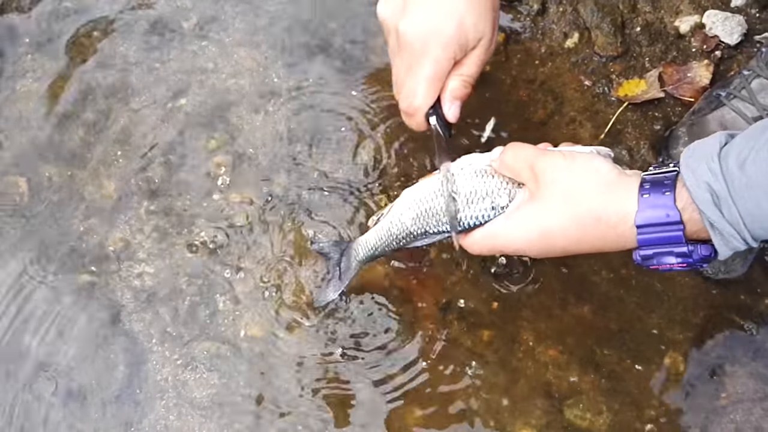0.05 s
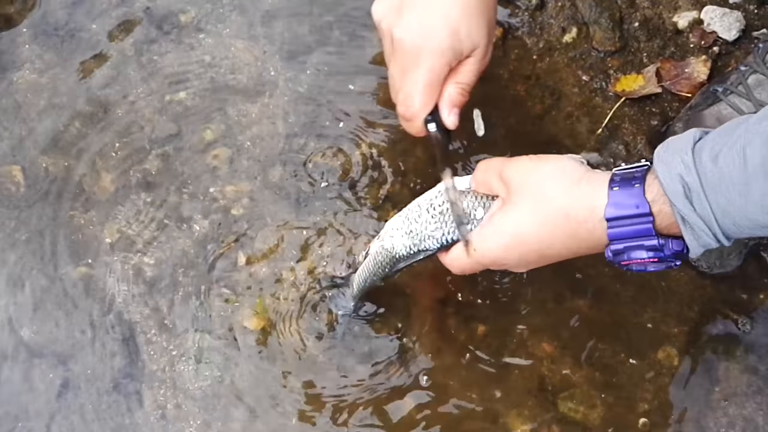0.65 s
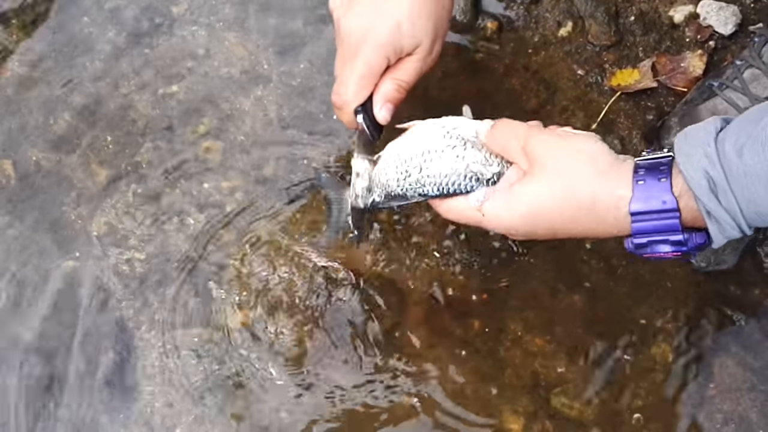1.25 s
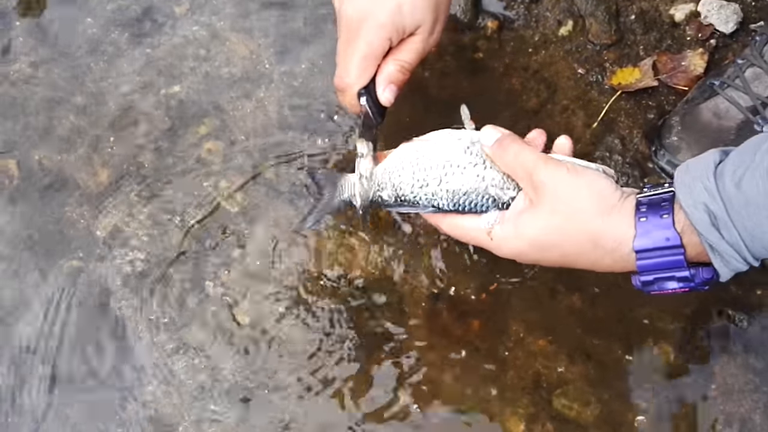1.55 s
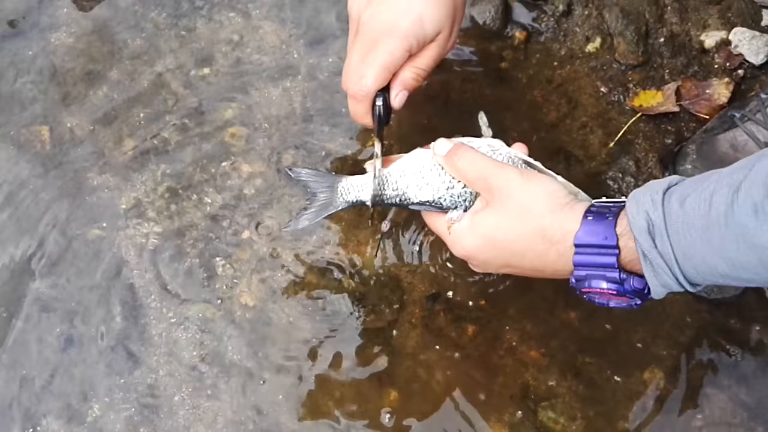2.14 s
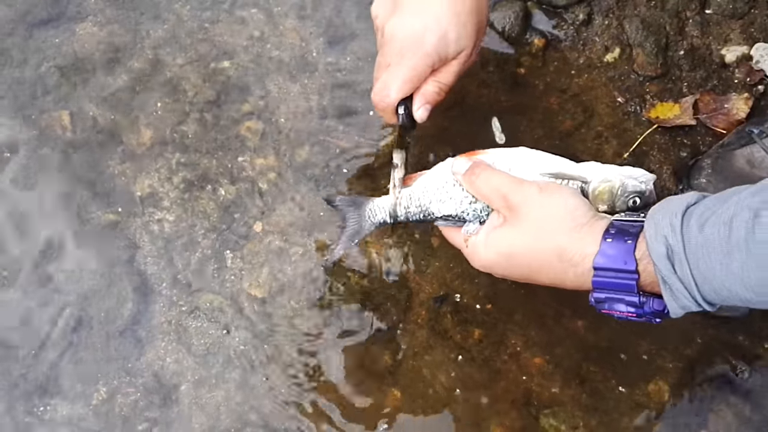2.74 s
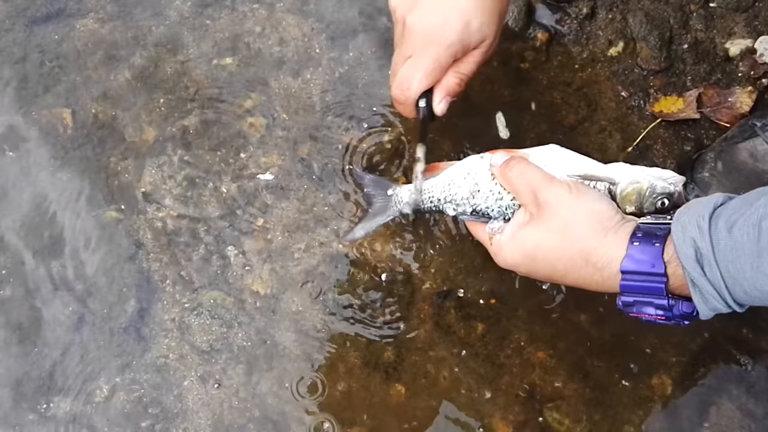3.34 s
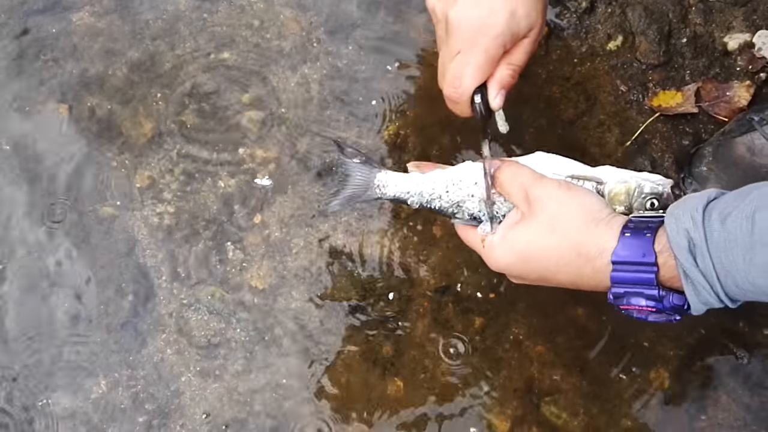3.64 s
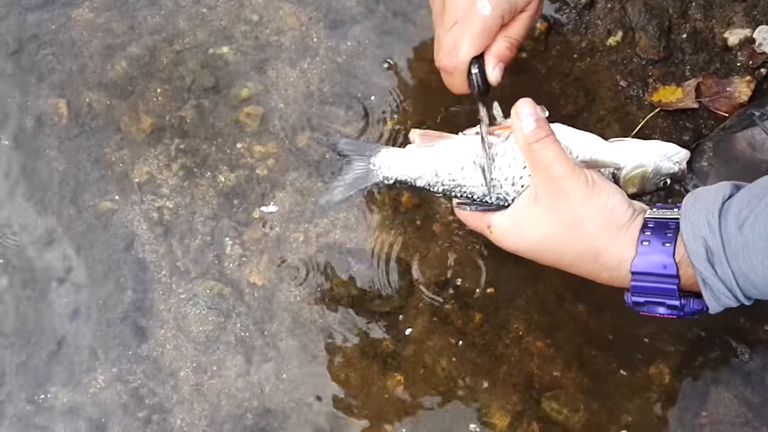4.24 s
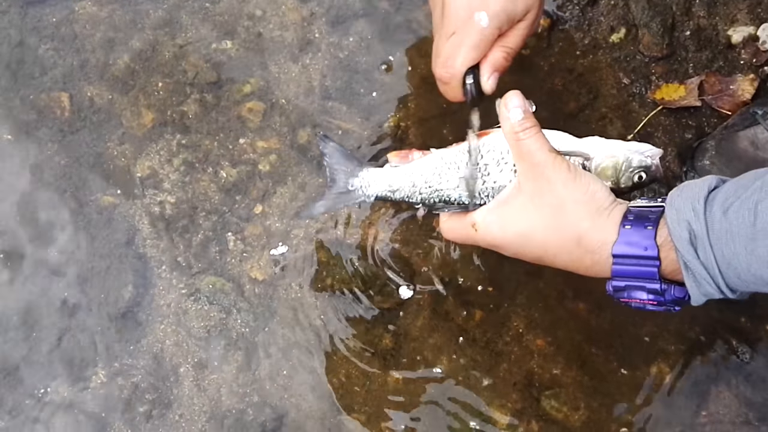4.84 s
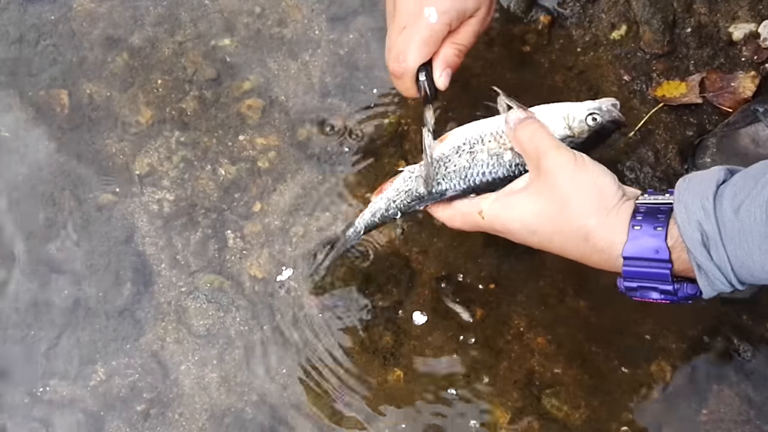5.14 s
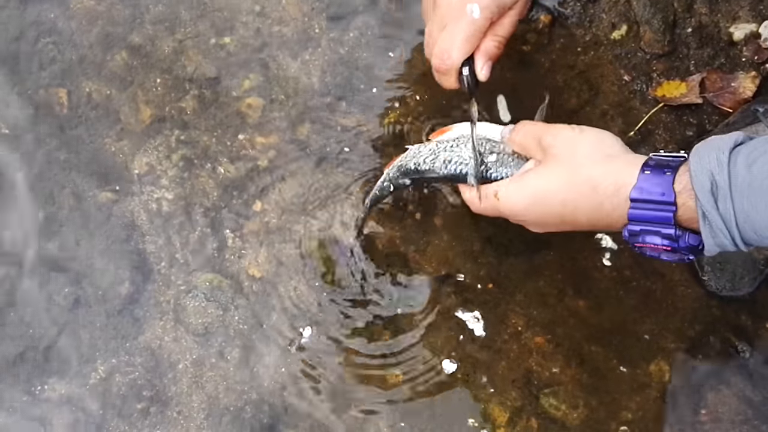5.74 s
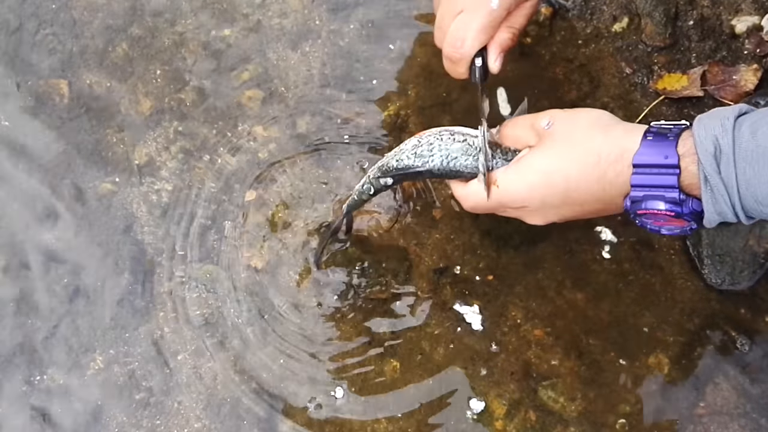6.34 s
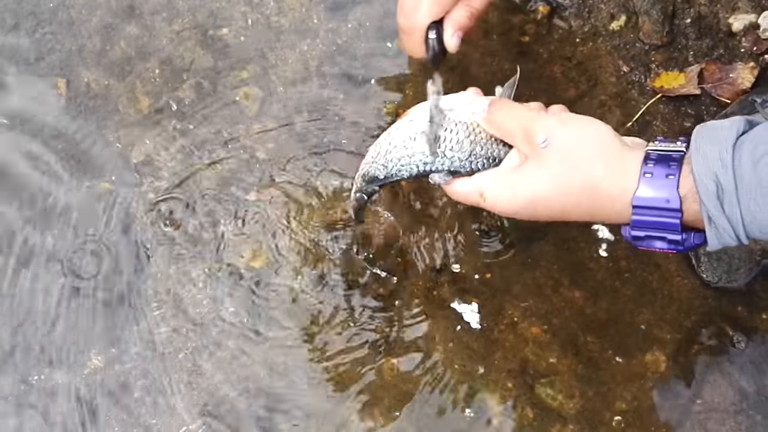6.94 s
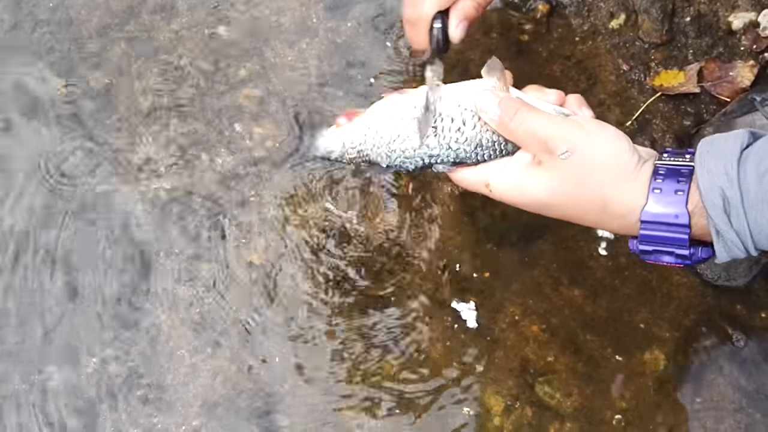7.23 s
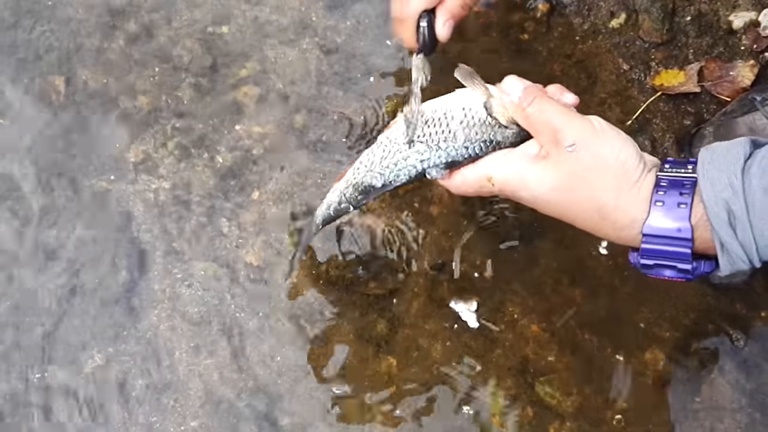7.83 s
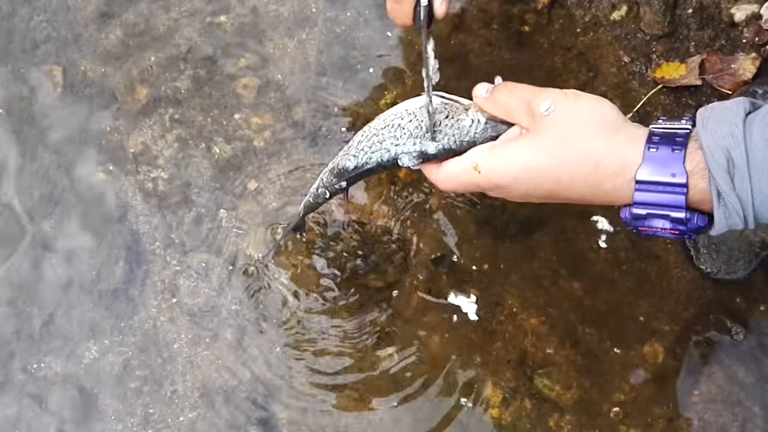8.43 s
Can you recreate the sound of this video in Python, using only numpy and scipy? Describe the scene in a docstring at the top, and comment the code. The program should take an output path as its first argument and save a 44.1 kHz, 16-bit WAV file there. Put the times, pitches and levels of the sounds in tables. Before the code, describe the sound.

A shallow river runs with a soft, even hiss throughout. Close to the microphone, a knife scrapes scales off a small fish in short, irregular strokes, a bright crackle over a duller rasp. During the first second or so, scales snap free sharply, wet skin squelches and a few faint drops fall into the water. From about 1.4 to 2 seconds the scraping pauses and the wet hand creaks softly as it turns the fish. The strokes resume at 2.4 seconds, quick and full of clicks and snaps, with a few more drips after 4 seconds. At 4.7 seconds the knife rests, leaving only the water. A last run of scraping lasts from 5.5 to about 8.2 seconds, with small squelches coming more often. Air buffets the microphone with a dull thump around 6 seconds, and more faintly near 7.3 seconds.

```python
"""A small fish is scaled just above a shallow river, close to a stereo microphone; the water hisses throughout.
For the first second the knife crackles over scale edges and rasps the flesh; scales snap free, drops fall.
From 1.4 s the wet grip sticks and slips, creaking as the fish is turned. Scraping resumes at 2.4 s and
rests at 4.7 s. In the last run, 5.5 to 8.2 s, wet skin squelches more often and air buffets the microphone."""
import sys
import numpy as np
from scipy import signal
from scipy.fft import rfft, irfft
from scipy.io import wavfile
from scipy.ndimage import uniform_filter1d

SR = 44100
rng = np.random.default_rng(int(sys.argv[2]) if len(sys.argv) > 2 else 0)


def transcribe(u):
    """Save the signal u as a 16-bit wav file named by the first command-line argument.

    u: samples, shape (n,) or (channels, n), limited to [-1, 1]; the rate is SR.
    q: integer samples, one column per channel.
    """
    v = np.clip(np.atleast_2d(u).T, -1, 1)
    q = np.round(v * 32767).astype(np.int16)
    wavfile.write(sys.argv[1], SR, q)


N = 378378
TIME = np.arange(N) / SR
HZ = np.fft.rfftfreq(N, 1 / SR)
SIDES = np.array([[.5], [-.5]])  # splits a left-minus-right difference between the channels

# Table levels are relative, ahead of each source's gain; balance is left minus right.
# The river's spectrum at the microphone: f/Hz, level/dB
RIVER_SPECTRUM = [(15, -28), (25, -7), (66, 0), (125, -4), (170, -1.5), (300, -5), (800, -6), (2400, -5.5),
                  (3000, -4), (3900, 0), (7500, -2), (10700, 0), (13500, 0), (14300, -16), (14900, -55)]
# Its loudness over time: t/s, level/dB
RIVER_LEVEL = [(0, -48.5), (.8, -49), (1.35, -50), (1.9, -48.5), (2.8, -48.5), (4.6, -49.5), (5.3, -50.5),
               (5.8, -50), (7.3, -49.5), (8.58, -51.5)]
# How alike it is left and right: f/Hz, correlation
RIVER_CORRELATION = [(60, 0.5), (130, 0.7), (290, 0.79), (640, 0.66), (1410, -0.26), (3100, -0),
                     (6820, -0.091), (15000, -0.08)]
# Its lean in the stereo image: f/Hz, balance/dB
RIVER_PAN = [(60, -1.5), (150, -1), (700, -1), (4500, -.5), (8500, -2.5), (10800, -12), (12000, -5.5),
             (14000, 1)]
# Air on the microphone: middle t/s, length/s, level/dB, upper edge f/Hz
AIR_PUFFS = [(5.974, 0.034, -57, 109), (6.063, 0.1, -49, 110), (6.051, 0.032, -47, 373),
             (6.258, 0.3, -56.5, 118), (7.318, 0.042, -55, 107), (7.412, 0.26, -70, 90)]
# Drops landing in the shallows: t/s, f/Hz, level/dB, ring/cycles, pitch glide
WATER_DROPS = [(.203, 1430, -51, 8.6, -0.048), (0.244, 804, -48, 1.4, -0.013), (.243, 1950, -47, 4, 0.0059),
               (.272, 520, -55, 2.8, -.02), (.63, 5200, -38.5, 5, -0.026), (.684, 2620, -51.5, 7.4, -0.015),
               (.925, 3180, -45, 5.5, -0.026), (1.022, 3000, -51, 12, -0.016),
               (4.104, 1540, -47.5, 3.9, -.02), (4.174, 1160, -49.5, 3.1, -.02),
               (4.462, 1350, -46.5, 5, -0.026)]
# The grip creaking: start t/s, length/s, slips per s, level/dB, f/Hz, t60/s
GRIP_CREAKS = [(1.422, .025, 61, -52.5, 270, 0.015), (1.546, .005, 70, -47, 400, 0.011),
               (1.576, .03, 102, -48.5, 250, 0.017), (1.624, .005, 70, -48.5, 250, 0.022),
               (1.762, .016, 164, -48, 310, 0.011), (1.788, .02, 79, -42, 310, 0.0074),
               (1.845, .058, 79, -38, 332, 0.0054), (1.93, .005, 70, -42, 330, 0.0072)]
# The hand sliding softly between slips: middle t/s, length/s, resonance f/Hz, level/dB
HAND_RUBS = [(1.685, 0.19, 250, -59), (2.015, 0.062, 210, -60)]
# The grip's phase between the microphone ports: f/Hz, left lead/rad
GRIP_LEAD = [(50, -0.4), (300, -1.8), (900, -1.3)]
# Wet skin under blade and fingers: middle t/s, length/s, resonance f/Hz, level/dB
SKIN_SQUELCHES = [ (.125, 0.058, 545, -57.5), (.352, 0.066, 554, -47), (.57, 0.061, 570, -53.5),
                  (.762, 0.062, 500, -53), (.851, 0.02, 550, -55), (.951, 0.073, 534, -56.5),
                  (4.425, 0.046, 920, -56), (4.485, 0.018, 966, -51.5), (4.583, 0.046, 1470, -52),
                  (4.636, 0.066, 980, -55), (5.791, 0.055, 623, -48.5), (6.839, 0.063, 1070, -52.5),
                  (7.032, 0.048, 1040, -49), (7.138, 0.052, 1210, -56.5), (7.226, 0.026, 1160, -43),
                  (7.32, 0.049, 1270, -52.5), (7.383, 0.024, 1090, -50), (7.407, 0.036, 1270, -42.5),
                  (7.505, 0.051, 1290, -54), (7.591, 0.065, 1330, -47), (7.704, 0.017, 1300, -50.5),
                  (7.793, 0.056, 1290, -52.5), (7.989, 0.034, 1230, -57)]
# Spectrum of small scales flicking off: f/Hz, level/dB
FLICK_SPECTRUM = [(500, -42), (2000, 2), (2800, -17), (3500, -6.5), (7000, 7), (13500, -11), (14300, -10),
                  (14900, -66)]
# Single scales snapping free: t/s, level/dB, balance/dB, body against treble/dB, tear against crack/dB
SCALE_SNAPS = [(0.2127, -37, 2, 10, -3), (.2205, -25.5, -1, -9, -7), (.2708, -32.5, 12, -23, -3),
               (0.3633, -13.5, -15, -10, 7), (0.371, -18, 7, 0, -11), (0.5833, -29.5, -6, 8, -4),
               (.5968, -28.5, 0, 6.5, -4), (0.677, -33, 0, -14, -5), (.9805, -34, -6, -11, -10),
               (0.9887, -10.5, -7, -4.5, -14), (1.02, -36, -11, 0, -4), (1.1855, -41, 10, -16, -10),
               (1.331, -26.5, 0, 5.5, -29), (1.427, -30.5, 0, -22, -18), (2.3387, -47, 2, 25, -19),
               (2.6658, -17, -6, -3, -10), (2.674, -27, -13, -16, -6), (2.7225, -27, -9, -11, -8),
               (2.788, -25, -5.5, 2.5, -5), (2.866, -24, -7, -4, 2), (2.92, -13.5, -2.5, -2.5, 2),
               (3.1483, -19.5, -1, -6, -11), (3.1655, -24.5, -2, -10, -1), (3.278, -26, -2, -16, -4),
               (3.299, -26, -4, -3, -3), (3.323, -18, -10, -10, -4), (3.439, -37, 5, -7, -6),
               (3.4833, -19, 1, -5, -3), (3.669, -34, -7, -14, -3), (3.8778, -23, -2, -1, -10),
               (3.904, -29, -8, -1, -7), (3.9203, -32, 2, 4.5, -3), (3.953, -26, 1, -16, -8),
               (3.9645, -39, 0, -2, -6), (4.072, -29, -3, -4, 0), (4.093, -24, 15, -30, -10),
               (4.1165, -29, 0, 2, -19), (4.1324, -31.5, -1, 3, -3), (4.265, -22, -14, -23, -23),
               (4.287, -25, -1, 2, 2), (4.406, -42.5, 6, 15, -14), (4.445, -24.5, -3, -27, 20),
               (4.4857, -27.5, 8, -13, 0), (4.5683, -23.5, 3, -7, -15), (4.6242, -26, 3, -3, 7),
               (4.667, -30, 8, -13, -8), (4.674, -17, -4, -7.5, -20), (5.55, -37, -2, -5, -3),
               (5.591, -29, -7, -5, 2), (5.7005, -28, 1, -20, -2), (5.763, -20, -7, -32, 8),
               (5.798, -30.5, 0, 11, -6), (5.98, -21.5, -3, -9, 8), (6.028, -26, -17, -2, 0),
               (6.071, -34, 8, -8, -1), (6.0804, -39.5, -3, 12, -4), (6.2099, -22, -4, 2, -9),
               (6.222, -35, -6, 2, -2), (6.269, -36, -2, -4, -2), (6.3585, -35, -7, -6, -16),
               (6.439, -24.5, -2, 0.5, -2), (6.6086, -29, 6, -16, -4), (6.658, -28, -4, -6, -3),
               (6.674, -36, -4, -3, -3), (6.828, -25, -5, 3, 9), (6.9023, -25, 4, -14, 6),
               (7.098, -46, -2, 12, 2), (7.108, -43, 1, -3, -6), (7.143, -37, -5, -14, -4),
               (7.2361, -20.5, -7, 5.5, -1), (7.289, -35.5, -1, 9, -2), (7.33, -36, -5, -8, 0),
               (7.479, -40, -1, 14, 1), (7.5172, -33, 3, -7, 6), (7.583, -33, -5, -8, -3),
               (7.614, -35, -5, 0, -12), (7.626, -38, -2, 0, -7), (7.6835, -31.5, -2, 5, 1),
               (7.8163, -18.5, -8, 2, -12), (7.843, -28.5, -17, -12, -10), (8.026, -30.5, -9, 1, -10),
               (8.085, -38, -16, -6, -2)]
# Spectrum of those snaps: f/Hz, level/dB
SNAP_SPECTRUM = [(200, -50), (500, -23), (1500, -16.5), (2700, -20.5), (3600, -10.5), (5500, -5),
                 (7200, -7.5), (8800, 1), (11000, -2.5), (13500, 4), (15000, -7.5), (15500, -27),
                 (16400, -34.5)]
# Passes of the blade, firm pushes and light returns:
# start t/s, length/s, place of greatest pressure/0-1, crackle level/dB, flesh level/dB, brightness/dB
BLADE_STROKES = [ (0.088, 0.099, 0.26, -27.5, -47, 1.5), (0.205, 0.082, 0.44, -45, -54, 3),
                 (0.317, 0.075, 0.85, -30.5, -50, 6.5), (0.393, 0.053, 0, -39.5, -69, 0),
                 (0.545, 0.044, 0.2, -31.5, -53.5, 1), (0.612, 0.073, 0.1, -43.5, -66, -3),
                 (0.728, 0.067, 0.2, -46, -59, 5.5), (0.82, 0.085, 0.4, -45, -60.5, 1),
                 (0.913, 0.048, 0.75, -43.5, -56, 1), (0.981, 0.055, 0, -36, -62, -2),
                 (1.072, 0.095, 0, -44, -60.5, 3.5), (2.396, 0.028, 0.45, -34.5, -58, -2.5),
                 (2.644, 0.061, 0.2, -30.5, -70, -3.5), (2.71, 0.024, 0.8, -32, -59, -2.5),
                 (2.855, 0.056, 0.13, -26, -54, -1), (2.966, 0.035, 0.66, -37, -59, 4),
                 (3.069, 0.022, 0.3, -21.5, -50, 1.5), (3.092, 0.059, 0.6, -31, -53.5, -1),
                 (3.268, 0.066, 0.14, -25.5, -49, 2.5), (3.345, 0.092, .3, -51, -80, -4),
                 (3.459, 0.044, 0.97, -29, -54, -1), (3.556, 0.066, 0.2, -45.5, -76, 2),
                 (3.676, 0.051, 0.47, -32, -53, -0.5), (3.844, 0.019, 0.4, -41.5, -70, 4.5),
                 (3.876, 0.051, 0.24, -28.5, -56, 0.5), (3.932, 0.082, 0, -43, -79, 0.5),
                 (4.052, 0.08, 0.1, -37, -54, -1.5), (4.189, .02, 0.2, -44.5, -66, 1.5),
                 (4.253, 0.022, 0, -35.5, -50, 1), (4.279, 0.028, 0.37, -29, -49, -1),
                 (4.312, 0.022, 0.2, -38.5, -57, 3), (4.403, 0.095, 0, -43.5, -50, 0),
                 (4.558, 0.096, 0.84, -47, -47.5, 4), (4.657, 0.032, 0.43, -31, -47.5, -0.5),
                 (5.53, 0.063, 0.97, -36, -56.5, 1), (5.588, 0.036, 0.35, -30.5, -51, 1),
                 (5.664, 0.061, 0.1, -46.5, -63, 1), (5.758, 0.092, 0.5, -31, -51, 0),
                 (5.877, 0.05, 0.74, -36, -63, -4.5), (5.978, 0.062, 0.58, -30, -51.5, 0.5),
                 (6.067, 0.028, 0.45, -36.5, -68, -8.5), (6.12, 0.019, 0.5, -39.5, -55.5, 1),
                 (6.172, 0.058, 0.88, -36, -53, 6.5), (6.263, 0.023, 0.8, -36.5, -68, -2),
                 (6.392, 0.12, 0.7, -44, -67, -1), (6.599, 0.039, 0.56, -38, -49, 0),
                 (6.639, 0.058, 0.1, -33, -62, 0), (6.814, 0.058, 0.52, -24.5, -53, 0.5),
                 (7.014, 0.066, 0.47, -36.5, -52.5, -2), (7.087, 0.043, 0.4, -40, -67, -4),
                 (7.208, 0.046, 0.74, -31.5, -56, -3), (7.275, 0.046, 0.3, -45, -69, -5),
                 (7.385, 0.055, 0.77, -31.5, -55, -2.5), (7.574, 0.06, 0.83, -34, -64, -2.5),
                 (7.814, 0.021, 0.3, -23.5, -65, -3), (7.845, 0.043, 0, -42.5, -74, 0),
                 (8.004, 0.094, 0, -38.5, -75, -3), (8.21, 0.036, 0.4, -32, -51, 2)]
# Spectrum of the rasping flesh: f/Hz, level/dB
FLESH_SPECTRUM = [(100, -22), (300, -9), (520, 6), (750, 0.5), (1000, 3.5), (1600, 2.5), (2500, 0),
                  (4000, -11.5), (13500, -3), (14300, -24), (14900, -86)]
# Spectrum of the crackling scale edges: f/Hz, level/dB
SCALE_SPECTRUM = [(400, -39.5), (1200, -21.5), (2000, -15.5), (2800, -21.5), (3550, -4.5), (4300, -9.5),
                  (5200, -4), (7200, -5.5), (8800, 2.5), (10000, 3), (11500, 0.5), (13200, 2.5),
                  (14300, -3), (14900, -64), (16400, -62)]
# Lean of the scrapes and snaps at close range: f/Hz, balance/dB
KNIFE_PAN = [(500, 3), (1400, 11.5), (2400, 0), (3200, 5), (4300, 1.5), (5200, 1), (6400, 4), (7400, -3),
             (8200, 3.5), (9000, -4), (9800, 2), (10800, -7.5), (11700, 0), (12300, 12.5), (12900, 12.5),
             (14000, 8)]
# The knife's phase between the microphone ports: f/Hz, left lead/rad
KNIFE_LEAD = [(2400, 0), (3700, -1), (5200, 1.5), (7200, -.5), (8200, 1), (9300, 1.1), (10000, 3.5),
              (11000, 6.6), (11800, 10.5), (13000, 8.5), (14200, 13)]


def amp(db):
    """Decibels to gain."""
    return 10 ** (np.asarray(db) / 20)


def unit_rms(x):
    """Scales to rms 1."""
    return x / np.sqrt(np.mean(x ** 2) + 1e-20)


def curve_at(points, hz):
    """Reads a table on a log-frequency axis."""
    f, value = np.transpose(points)
    return np.interp(np.log(hz + 1), np.log(f + 1), value)


def add(mix, s, sound):
    """Adds a sound to the stereo mix at time s."""
    part = mix[:, max(round(s * SR), 0):][:, :sound.shape[-1]]
    part += sound[..., :part.shape[1]]


def coloured(x, spectrum, balance=((1, 0), (2, 0)), size=2048):
    """Minimum-phase filter of unit energy, with a left-right balance by frequency."""
    hz = abs(np.fft.fftfreq(size, 1 / SR))
    log_gain = np.log(amp(np.maximum(curve_at(spectrum, hz), -100) + SIDES * curve_at(balance, hz)))
    taps = np.fft.ifft(np.exp(np.conj(signal.hilbert(log_gain)))).real
    return signal.oaconvolve(x, unit_rms(taps) / np.sqrt(size), axes=1)[:, :N]


def treble_share(x, from_hz, to_hz):
    """The part of a sound above a soft crossover."""
    size = x.shape[-1]
    return irfft(rfft(x) * np.interp(np.fft.rfftfreq(size, 1 / SR), [from_hz, to_hz], [0, 1]), size)


def at_microphone(x, lead, pan_db):
    """A close source reaches the two microphone ports at different phases and levels."""
    return irfft(rfft(x) * np.exp(1j * SIDES * curve_at(lead, HZ)), N) * amp(SIDES * pan_db)


def ring(t60, size=4096):
    """A dense dying ring of unit energy, different in each channel."""
    tail = rng.standard_normal((2, size)) * amp(-60 * np.arange(size) / SR / t60)
    return unit_rms(tail) / np.sqrt(size)


def ping(hz, cycles, glide):
    """A pocket of air or small body rings for a few cycles while its pitch slides."""
    age = np.arange(int(5 * cycles / hz * SR)) * hz / cycles / SR  # in decay times
    return np.sin(2 * np.pi * cycles * (age + glide * age ** 2)) * np.exp(-age) * (1 - np.exp(-5 * age))


def resonate(x, hz, width_hz):
    """A resonance that follows the curve hz."""
    turn = np.exp(2j * np.pi * np.cumsum(hz) / SR)
    return (turn * signal.lfilter(*signal.butter(2, width_hz / 2, fs=SR), x / turn)).real


def river():
    """Shallow water running below the microphone: a soft, even wash with a fine bright hiss."""
    hz = np.fft.rfftfreq(1024, 1 / SR)
    noise = rng.standard_normal((4, N // 256 + 5, len(hz)))
    left, unrelated = noise[::2] + 1j * noise[1::2]
    alike = curve_at(RIVER_CORRELATION, hz)
    frames = np.array([left, alike * left + np.sqrt(1 - alike ** 2) * unrelated])
    frames *= amp(curve_at(RIVER_SPECTRUM, hz) + (SIDES * curve_at(RIVER_PAN, hz))[:, None])
    wash = signal.istft(frames.transpose(0, 2, 1), nperseg=1024, noverlap=768)[1][:, :N]
    return unit_rms(wash) * amp(np.interp(TIME, *np.transpose(RIVER_LEVEL)) + 1)


def bank_scatter(close):
    """The riverbank throws a faint, short scatter of the knife back to the microphone."""
    return amp(-22) * signal.oaconvolve(close, ring(t60=.15, size=8192), axes=1)[:, :N]


def air_puffs(gust_end_s=6.064):
    """Air buffets the two ports separately, the left far more; one gust swells to a dull thump."""
    out = np.zeros((2, N))
    for s, length, db, edge_hz in AIR_PUFFS:
        swell = np.hanning(int(2 * length * SR)) ** 2
        band = signal.butter(3, [18, edge_hz], "band", fs=SR)
        rumble = signal.lfilter(*band, rng.standard_normal((2, SR)))[:, -len(swell):]
        add(out, s - length, amp(db) * unit_rms(rumble * swell) * np.sqrt(np.mean(swell ** 2)))
    thump = ping(hz=188, cycles=1, glide=-0.041)[::-1]  # reversed: it grows, then breaks off
    add(out, gust_end_s - len(thump) / SR, amp(-27.5) * thump)
    return out * amp(SIDES * 20.7 - 3)


def drops():
    """Drops fall off the fish into the shallows, each ringing a small bubble."""
    out = np.zeros((2, N))
    for s, hz, db, cycles, glide in WATER_DROPS:
        add(out, s, amp(db + 11) * ping(hz, cycles, glide))
    return out


def squelches(events, rise, arch=.08, waver=0.041, slips_per_s=230, pocket_q=5.5, spray_db=-5):
    """Uneven slips of wet skin ring a squeezed pocket, bending its pitch; each spits a little water."""
    out = np.zeros((2, N))
    for s, length, hz, db in events:
        count = int(2 * length * SR)
        jitter, hiss, left, right, force = rng.standard_normal((5, SR // 2))[:, :count]
        jitter = unit_rms(uniform_filter1d(jitter, 200))
        slips_so_far = np.floor(np.cumsum(slips_per_s * np.exp(0.62 * jitter)) / SR)
        slips = unit_rms(np.diff(slips_so_far, prepend=0) * amp(2.6 * force))
        squeeze = np.linspace(-1, 1, count)
        pitch = hz * np.exp(rise * squeeze - arch * squeeze ** 2 + waver * jitter)
        friction = slips + 0.35 * (hiss + np.array([left, right]))
        pocket = resonate(friction, pitch, width_hz=np.hypot(130, hz / pocket_q))
        spray = resonate(slips, pitch, width_hz=hz)
        swell = np.hanning(count) ** 2
        squelch = unit_rms(pocket * swell) + amp(spray_db) * unit_rms(spray * swell)
        add(out, s - length, amp(db) * unit_rms(squelch) * np.sqrt(np.mean(swell ** 2)))
    return out


def grip(sag=0.31, sag_s=0.00083, attack_s=0.00035, muffle_hz=(90, 950)):
    """The soft hand, right of centre, sticks and slips in runs of dull knocks that sag in pitch."""
    out, t = np.zeros((2, N)), np.arange(2500) / SR
    for start, length, per_s, db, hz, t60 in GRIP_CREAKS:
        turns = np.cumsum(hz * (1 - sag + np.exp(-t / sag_s))) / SR
        envelope = amp(db + 11 - 60 * t / t60) * (1 - np.exp(-t / attack_s))
        knock = -envelope * np.sin(2 * np.pi * turns)
        lateness, force_db = rng.standard_normal((2, 16))
        gaps = np.exp(0.133 * lateness) / per_s
        for when, gain in zip(np.cumsum(gaps) - gaps[0], amp(force_db)):
            add(out, start + when, knock * gain * (when < length))
    creaks = signal.lfilter(*signal.butter(2, muffle_hz, "band", fs=SR), out)
    return at_microphone(creaks + squelches(HAND_RUBS, rise=0), GRIP_LEAD, pan_db=-6)


def pressure(t, length, crest, follows, bite_s=0.011, release_s=0.008):
    """Gain of one pass: the edge bites, swells to a crest, eases and lets go; follows scales the swell."""
    bite = 1 / (1 + np.exp(-8 * t / bite_s))
    release = 1 / (1 + np.exp(np.minimum(8 * (t - length) / release_s, 80)))
    crest_s = length * np.clip(crest, .02, .98)
    swell = amp(follows * np.interp(t, [0, crest_s, length], [-7.5, 0, -11]))
    touch = (t < 0) * amp(-45 - 450 * abs(t))  # the blade brushes the scales before it bites
    drag = (t > length) * amp(-19.5 - 114 * abs(t - length))  # loosened scales rustle on
    return np.sqrt(bite * release * swell ** 2 + touch ** 2 + drag ** 2)


def flicks(per_s=60, low_hz=3360, high_hz=10200, spread_db=12.5):
    """Small scales tick off at random in each pass, each at its own pitch, louder as the blade presses."""
    out = np.zeros((2, N))
    for start, length, crest, db, _, _ in BLADE_STROKES:
        gap, strength, pitch, side = rng.random((40, 4)).T
        when = np.cumsum(2 * gap) / per_s
        gain = pressure(when, length, crest, follows=0.64) * amp(db - 7.5 + spread_db * strength)
        for k in np.flatnonzero(when < length):
            tick = ping(low_hz * (high_hz / low_hz) ** pitch[k], cycles=3.1, glide=0)
            add(out, start + when[k], gain[k] * amp(SIDES * 27 * (side[k] - .5)) * tick)
    return coloured(out, FLICK_SPECTRUM)


def snaps(tear_s=.0016, tear_lead_s=.0009, slips_per_s=2000, hard_db=-21, size=4096):
    """A scale tears loose in a few slips, then flicks free with a sharp crack and a brief flutter."""
    top, body = np.zeros((2, 2, N))
    t = (np.arange(size) - size // 4) / SR
    tear_window = np.exp(-.5 * ((t + tear_lead_s) / tear_s) ** 2)
    for s, db, pan_db, body_db, tear_db in SCALE_SNAPS:
        slips = rng.standard_normal(size) * (rng.random(size) < slips_per_s / SR) * tear_window
        force = (t == 0) + amp(tear_db) * unit_rms(slips) / np.sqrt(size)
        crack, flutter = ring(t60=.0025), amp(0.5) * ring(t60=.019)
        crack[:, 0] += amp(-1.5)  # its onset reaches both channels alike
        snap = signal.fftconvolve(force[None], crack + flutter, axes=1)[:, :size]
        snap = unit_rms(snap) * amp(db + SIDES * pan_db) * np.sqrt(.004 * SR / size)  # level over 4 ms
        softness = 1 - amp(min(db - hard_db, 0)) ** 2  # only hard snaps keep all their topmost treble
        snap -= softness * treble_share(snap, 14300, 14700)
        add(top, s + t[0], snap)
        add(body, s + t[0], snap * amp(body_db))
    return amp(-1.7) * coloured(body + treble_share(top - body, 3600, 11200), SNAP_SPECTRUM, KNIFE_PAN)


def crackle(size, per_s, spread_db, scatter):
    """Stereo train of tiny clicks of uneven size, each from a slightly different direction."""
    height = amp(spread_db * np.minimum(rng.exponential(1, size), 3)) * (rng.random(size) < per_s / SR)
    return unit_rms(height * (rng.choice([-1, 1], size) + scatter * rng.standard_normal((2, size))))


def mottled(x, patch_db, clump_db):
    """Scales give way in clumps, and each clump rings with a colour of its own."""
    frames = signal.stft(x, nperseg=128)[2]
    patches = uniform_filter1d(rng.standard_normal(frames.shape[1:]), size=4, axis=0)
    patches = unit_rms(uniform_filter1d(patches, size=4, axis=1))
    clumps = unit_rms(uniform_filter1d(rng.standard_normal(frames.shape[2]), size=3))
    return unit_rms(signal.istft(frames * amp(patch_db * patches + clump_db * clumps), nperseg=128)[1])


def steadied(x, seconds):
    """Holds the short-term power at 1."""
    return x / np.sqrt(abs(uniform_filter1d((x ** 2).mean(0), int(seconds * SR))) + 1e-3)


def scraping(rows_per_s=49.6, ripple_db=0.26, size=12288):
    """The blade lifts rows of scale edges: bright crackle over the duller rasp of the flesh."""
    bright, dull = np.zeros((2, 2, N))
    t = np.arange(size) / SR - .02
    for start, length, crest, db, flesh_db, bright_db in BLADE_STROKES:
        edges = crackle(size, per_s=2800, spread_db=-3, scatter=0.54)
        edges += amp(-3) * signal.oaconvolve(edges, ring(t60=.006), axes=1)[:, :size]
        edges = steadied(mottled(edges, patch_db=2.4, clump_db=2), seconds=.014)
        treble = treble_share(edges, 2700, 10800)
        edges = treble * amp(bright_db) + (edges - treble) * amp(-bright_db)
        # the edge bumps over the rows at an uneven speed
        speed = np.exp(0.74 * unit_rms(uniform_filter1d(rng.standard_normal(size), size=400)))
        bumps = np.cos(2 * np.pi * (rng.random() + np.cumsum(rows_per_s * speed) / SR))
        edges *= pressure(t, length, crest, follows=0.72) * amp(db - ripple_db * bumps)
        add(bright, start + t[0], edges)
        flesh = steadied(crackle(size, per_s=600, spread_db=3, scatter=0.4), seconds=0.024)
        add(dull, start + t[0], flesh * pressure(t, length, crest, follows=0.96) * amp(flesh_db))
    scales = amp(1.05) * coloured(bright, SCALE_SPECTRUM, KNIFE_PAN)
    return scales + amp(0.1) * coloured(dull, FLESH_SPECTRUM)


def knife():
    """Scrapes, ticks and snaps, close to the microphone and slightly to one side."""
    return at_microphone(scraping() + flicks() + snaps(), KNIFE_LEAD, pan_db=-2)


def scene():
    """Knife and fish in the foreground, with the bank and the river behind."""
    close = knife()
    bank = bank_scatter(close)
    wet_skin = squelches(SKIN_SQUELCHES, rise=0.071) * amp(SIDES * 1.5)  # a little to the left
    return close + bank + wet_skin + drops() + grip() + air_puffs() + river()


def record(dry, edge_hz=16400):
    """The microphone's top treble falls away, then stops at a steep band limit."""
    treble = amp(curve_at([(14200, 0), (15000, -8), (16400, -14)], HZ))
    sound = irfft(rfft(dry) * treble, N)
    band_limit = signal.firwin(511, edge_hz, window=("kaiser", 9), fs=SR)
    return signal.oaconvolve(sound, band_limit[None], "same")


dry = scene()
out = record(dry)
transcribe(out)
```